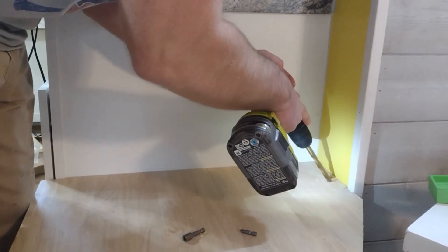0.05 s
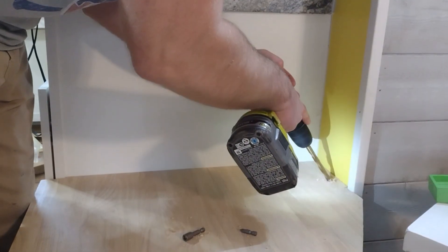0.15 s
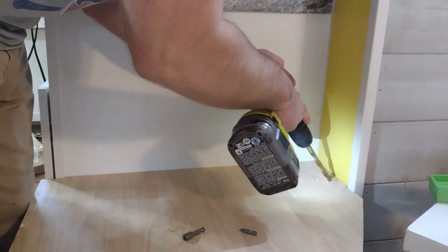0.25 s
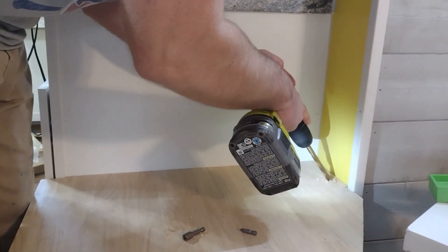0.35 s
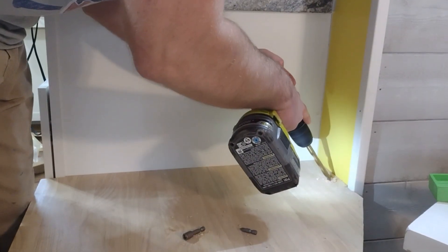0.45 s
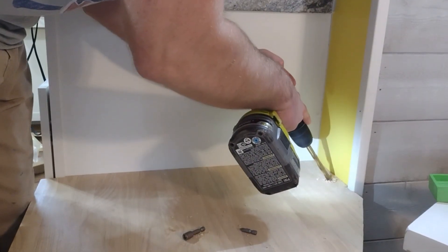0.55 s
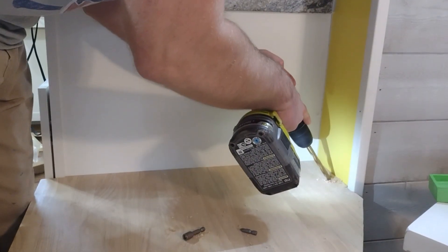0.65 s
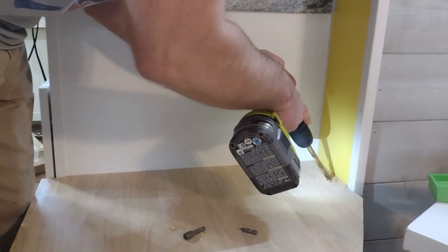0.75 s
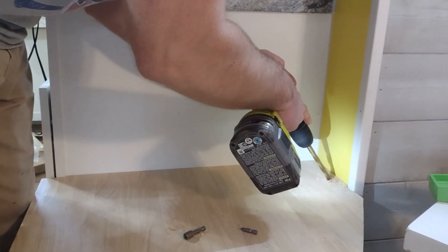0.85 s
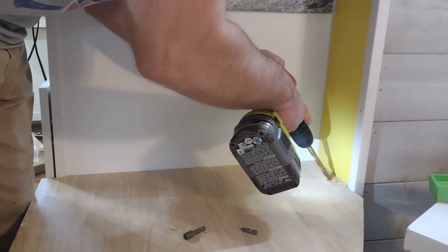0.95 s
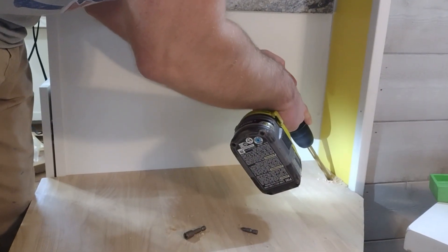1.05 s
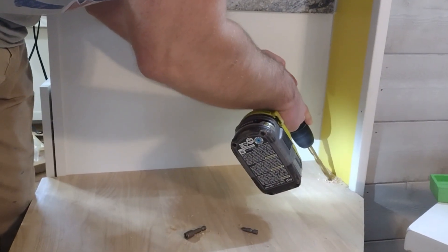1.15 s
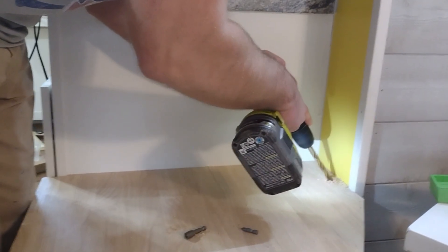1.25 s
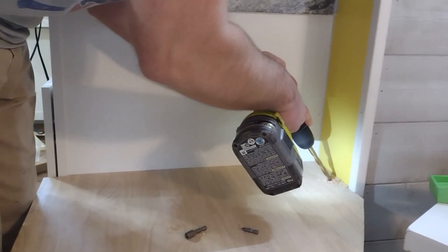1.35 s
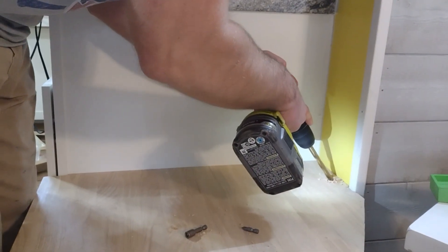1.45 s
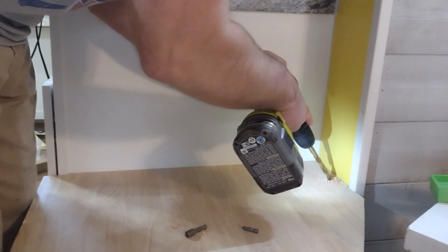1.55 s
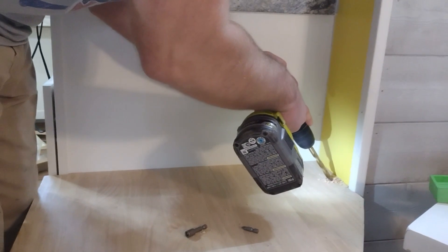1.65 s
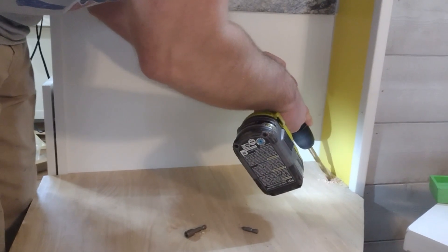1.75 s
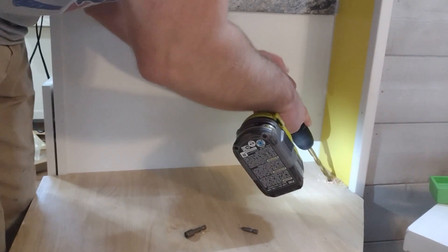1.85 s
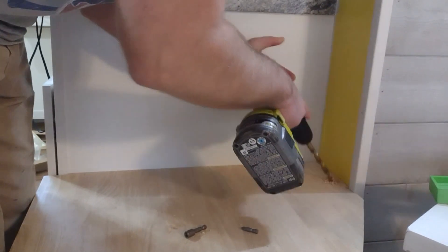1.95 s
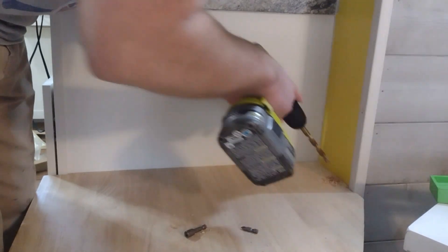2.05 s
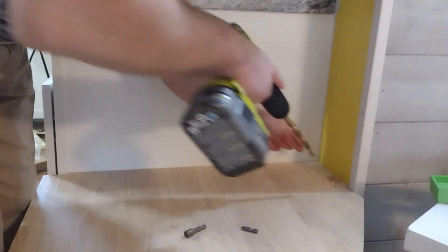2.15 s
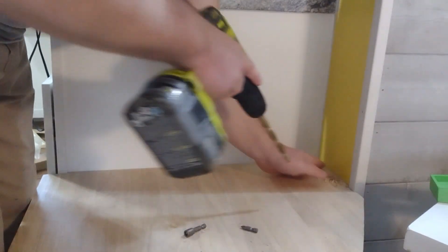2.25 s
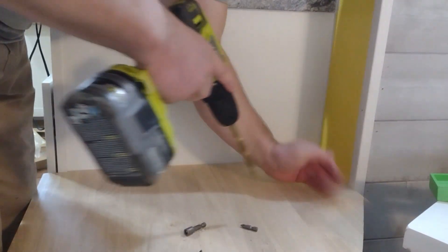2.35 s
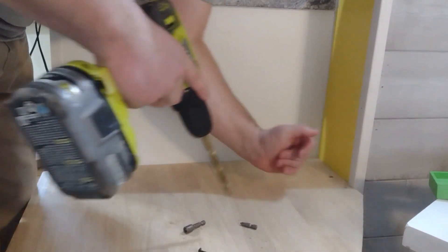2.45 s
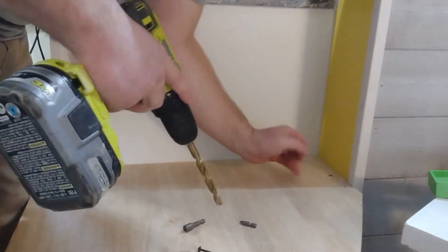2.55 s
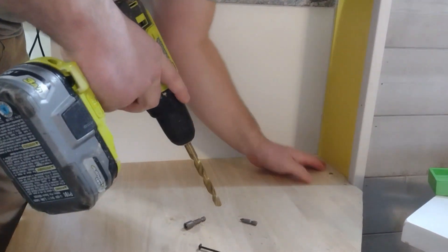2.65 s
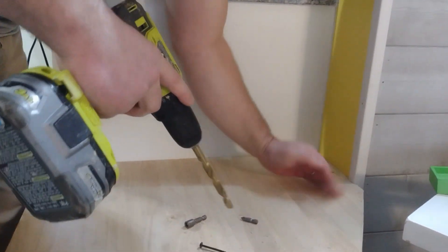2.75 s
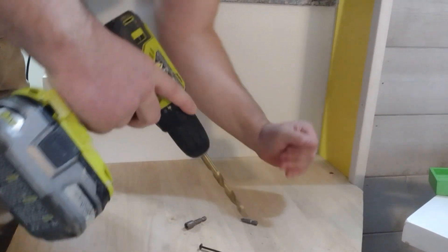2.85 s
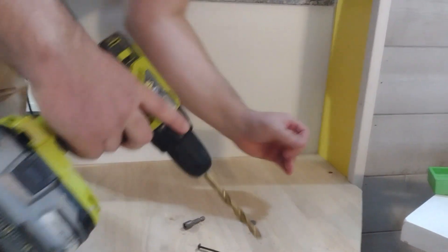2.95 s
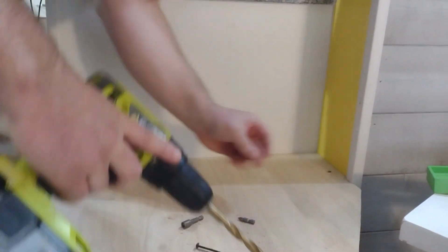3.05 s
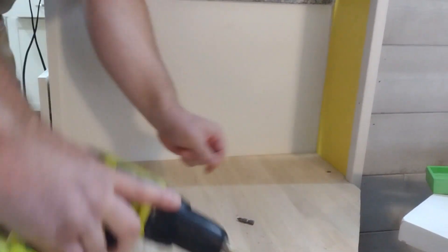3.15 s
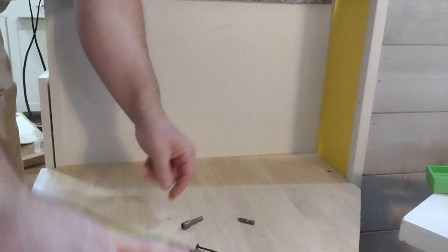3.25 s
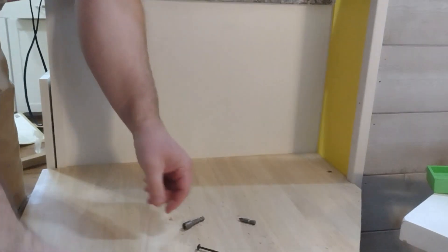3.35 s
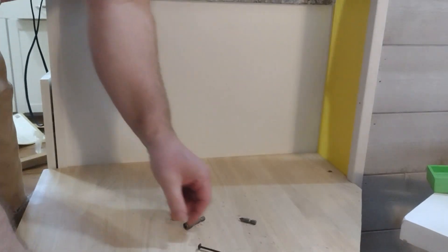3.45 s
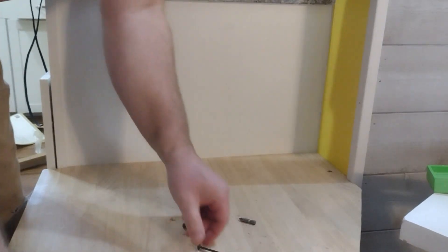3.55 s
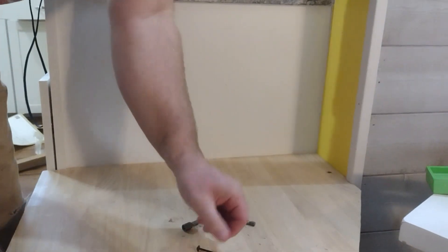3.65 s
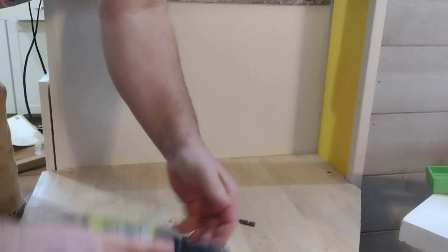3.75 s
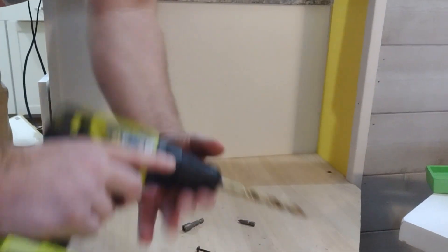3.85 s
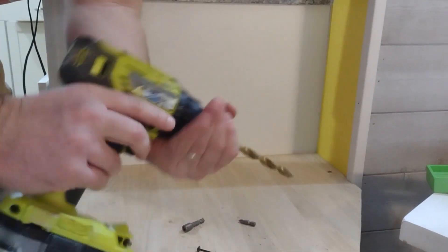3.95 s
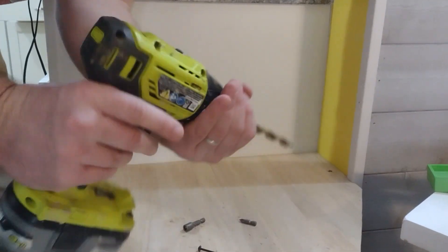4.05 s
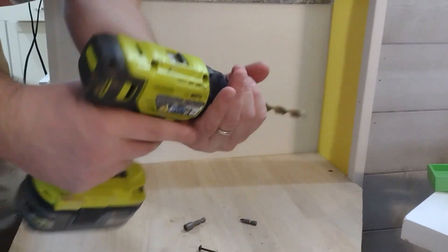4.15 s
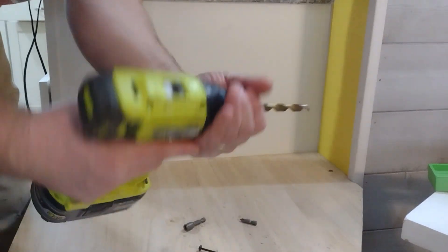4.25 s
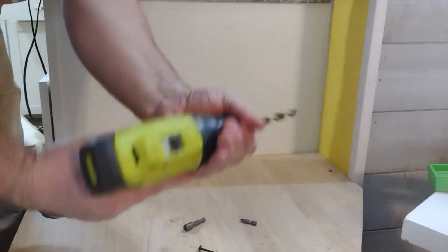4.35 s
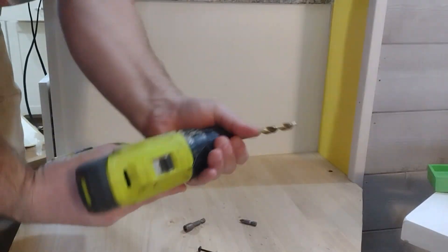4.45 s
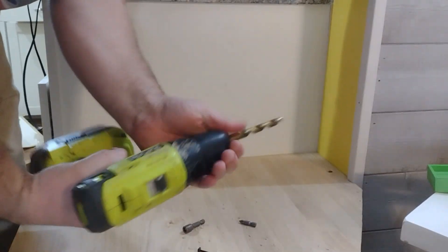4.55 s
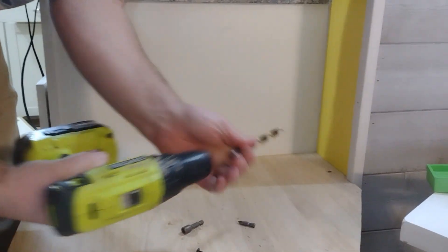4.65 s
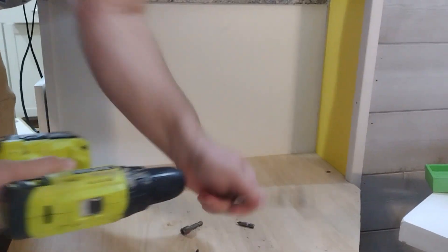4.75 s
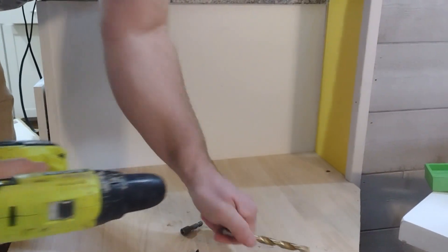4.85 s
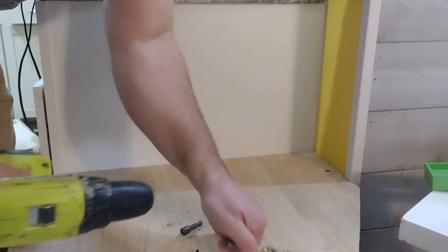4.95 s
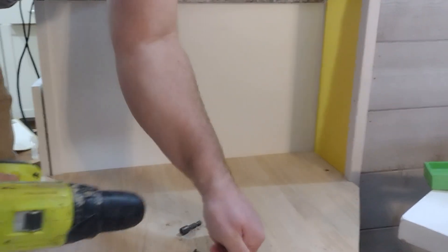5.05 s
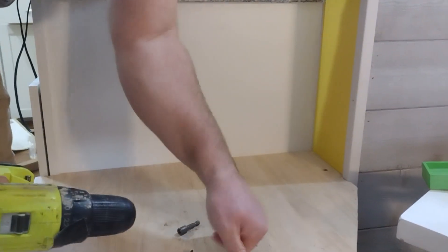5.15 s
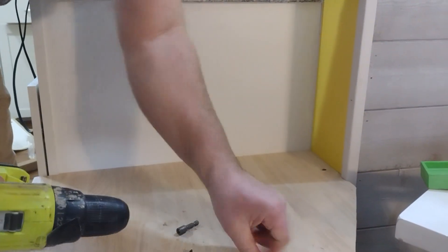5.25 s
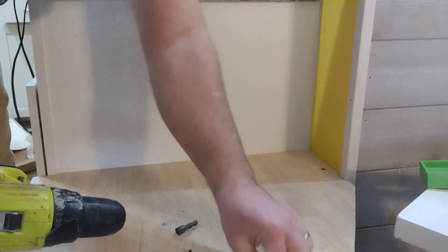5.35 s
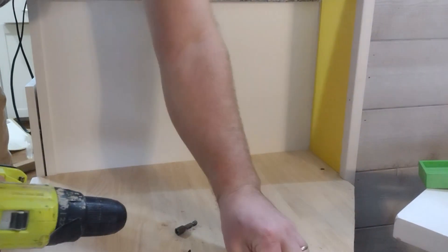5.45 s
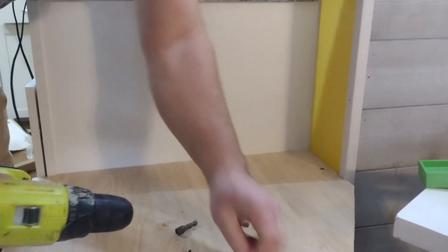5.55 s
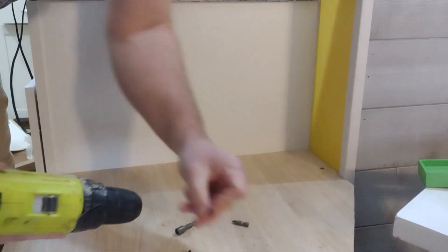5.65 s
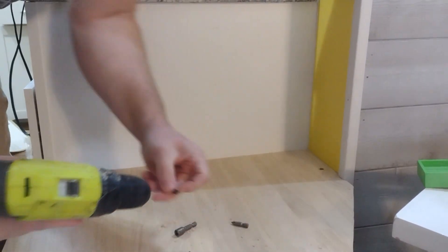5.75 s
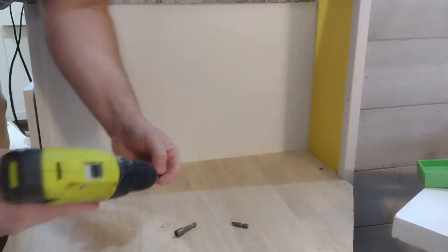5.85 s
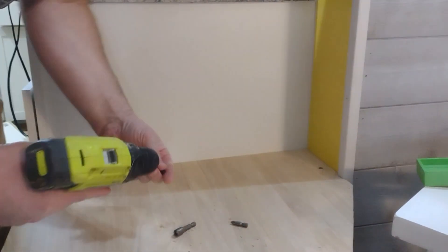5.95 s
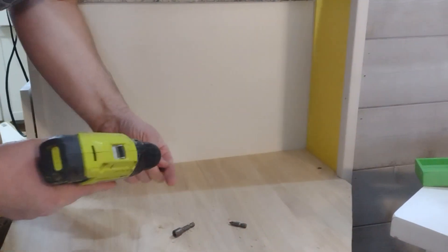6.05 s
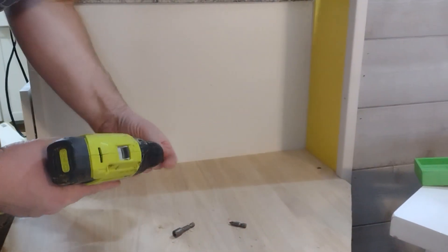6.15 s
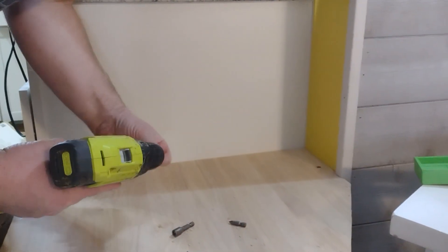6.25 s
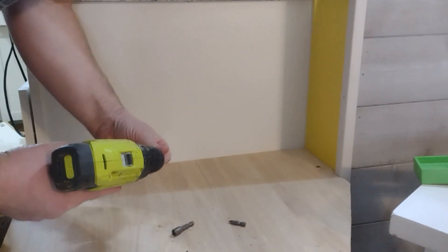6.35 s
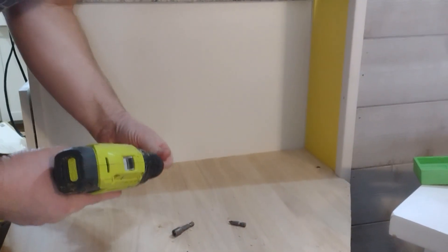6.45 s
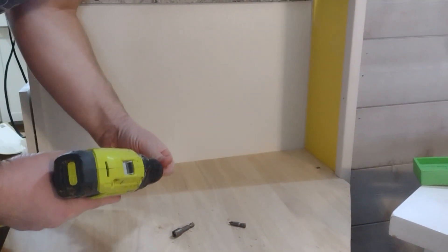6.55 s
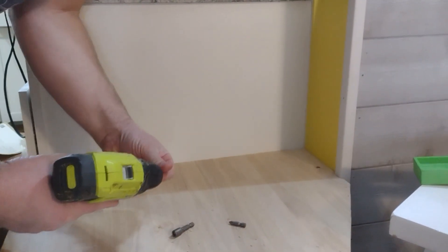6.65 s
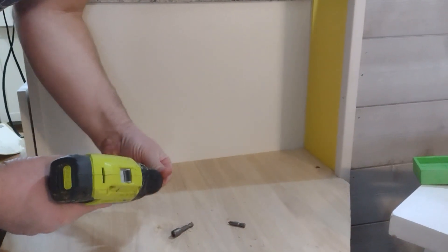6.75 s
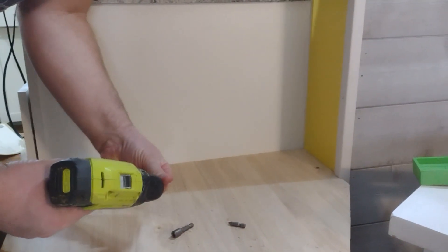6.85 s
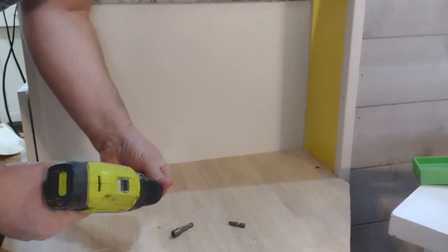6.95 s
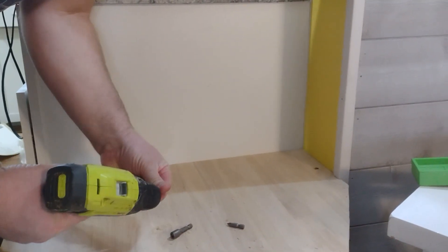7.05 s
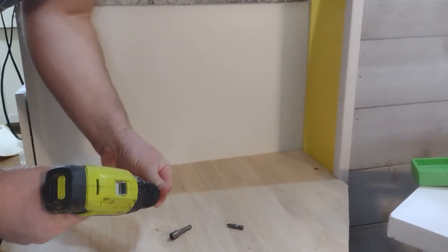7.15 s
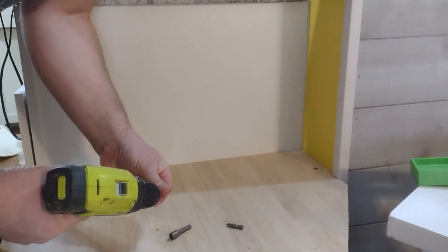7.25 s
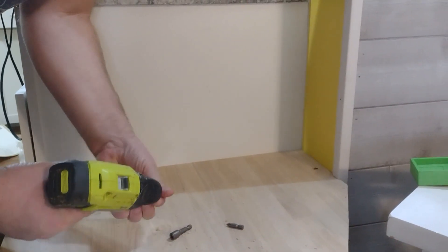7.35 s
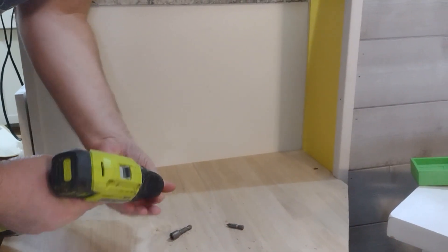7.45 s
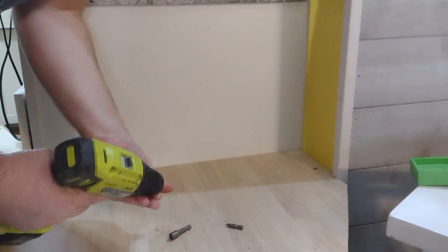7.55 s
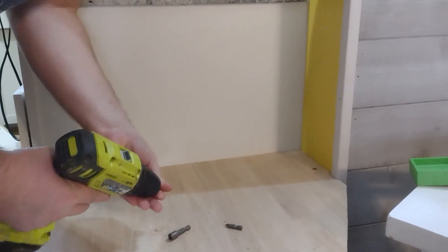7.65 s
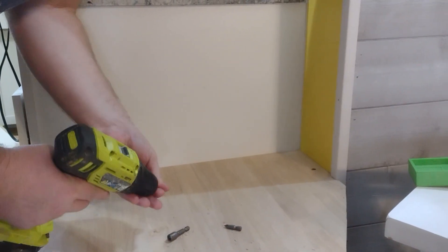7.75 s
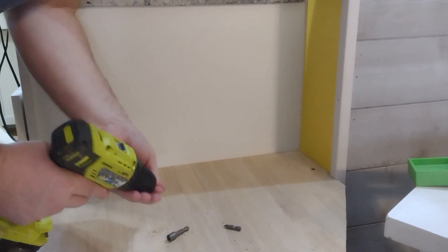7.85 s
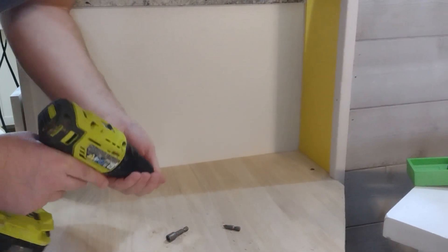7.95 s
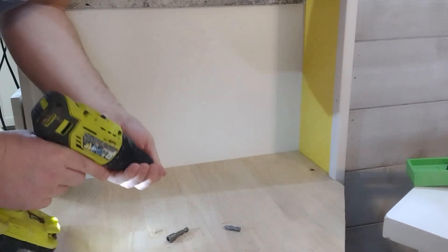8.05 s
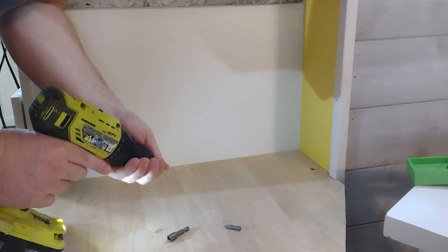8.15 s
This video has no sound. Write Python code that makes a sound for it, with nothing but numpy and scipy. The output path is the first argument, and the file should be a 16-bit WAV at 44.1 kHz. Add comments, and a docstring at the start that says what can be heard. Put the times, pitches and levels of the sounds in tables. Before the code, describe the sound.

Two seconds of loud, rough drilling in wood with a thin high squeal near the end, cut off by a sharp clack. Afterwards it is nearly silent: soft palm swishes on dusty board, a heavy wooden bump, plastic snaps with a very short motor spin, a double knock with a faint steel ring. Finally two chuck clicks, rustling clothing and dull shifting feet. Small indoor room, near stereo microphones, faint background wash.

```python
"""Boring into a wooden cabinet floor

A cordless drill bores with a clatter of gears, throbbing once a turn, and stops with a clack.
A hand sweeps the dust off, the drill bumps the board, the chuck clicks and is spun briefly in the hand.
Knocks excite the cabinet's modes and make loose steel bits ring; feet shift and clothes rub in a small room.
Noise, pulses and sines drive the sources; filters give their resonances, and echoes and a tail the room."""
import sys
import numpy as np
from scipy import signal
from scipy.io import wavfile
from scipy.ndimage import uniform_filter1d

SR = 44100
rng = np.random.default_rng(int(sys.argv[2]) if len(sys.argv) > 2 else 0)


def unload_wav(signal):
    """Save mono or channel-first audio to the path in sys.argv[1] as 16-bit WAV at rate SR, clipped to [-1, 1]."""
    wavfile.write(
        sys.argv[1],
        SR,
        np.round(np.clip(np.atleast_2d(signal).T, -1, 1) * 32767).astype(np.int16),
    )


N = 361619
TAPS = 8192
HZ, T = np.fft.rfftfreq(TAPS, 1 / SR), np.arange(N) / SR  # filter frequencies [Hz], time [s]


def drill():
    """Forced vibration: gear impacts excite the housing, while periodic cutting force tears the fibres."""
    # chuck speed while boring: (time [s], speed [turns/s])
    speed_curve = [(0, 15.4), (.6, 15.5), (.72, 17.2), (.9, 15.9), (1.28, 15.9), (1.36, 13.8), (1.44, 15.8),
                   (1.85, 15.6), (2.06, 13)]
    # motor noise spectrum: (frequency [Hz], relative density [dB])
    motor_spectrum = [(60, -27), (200, -12), (500, -5), (1200, -2.5), (2100, -1.5), (2600, -1.5),
                      (3600, -2.5), (4200, 1), (4600, -8.5), (6000, -9), (7200, -4.5), (11000, -11.5),
                      (13500, -15.5), (15200, -11.5)]
    # modes of the drill's housing and bit: (frequency [Hz], width [Hz], level [dB])
    housing_modes = [(2065, 120, 5.5), (3020, 150, 2.5), (4256, 110, 4), (5070, 460, 7.5), (7000, 400, 0)]
    # cutting noise spectrum ahead of the cabinet modes: (frequency [Hz], relative density [dB])
    cut_spectrum = [(30, -46), (60, -31), (90, -14.5), (180, 2.5), (500, 0), (1050, 0.5), (2000, -2),
                    (2600, -15), (4200, -18), (8000, -19.5), (16000, -41.5)]
    through_s, unload_s = 1.84, 0.15  # the bit breaks through; decay time of the load
    stop_s, brake_s = 2.055, .008  # the brake stops the motor; decay time
    motor_db, motor_unloaded_db = -25.5, -6  # loaded level, change without load
    cut_db, cut_db_per_s = -25.5, -1.36  # the cut slowly lightens
    whine_mid_db, whine_unloaded_db = -45, 1  # level at half load, change from full to no load
    bite_db, whine_bite_db = 4.4, 4  # per unit of bite

    running = gate(0, stop_s, brake_s)
    load = gate(0, through_s, unload_s)
    gears, tone, bite = gear_train(np.interp(T, *np.transpose(speed_curve)))

    housing = read(motor_spectrum) + sum(db * bump(hz, width) for hz, width, db in housing_modes)
    motor = unit(colour(gears, housing)) * amp(motor_db + motor_unloaded_db * (1 - load))

    fibres = shifting(wide(lambda: grains(per_s=2500, spread_db=2.5)), patch_db=1.5)
    fibres = fibres * amp(bite_db * bite + 1.0 * waver(41))
    cutting = unit(colour(fibres, read(cut_spectrum) + 1.3 * panel()))
    cutting = cutting * load * amp(cut_db + cut_db_per_s * T)

    whine = tone * amp(whine_mid_db + whine_unloaded_db * (0.5 - load) + whine_bite_db * bite * load)

    # the bit squeals as it sinks deep into the hole
    squeal_hz = 8150 + 22 * waver(150)
    squeal = unit(np.sin(2 * np.pi * np.cumsum(squeal_hz) / SR) * amp(2.5 * waver(40)))
    squeal = squeal * amp(-37.5) * swell(1.7, rise_s=.36, fall_s=.22)
    return room((motor + cutting + whine + squeal) * running, wet_db=-7.5, lag_ms=-.05)


def gear_train(speed):
    """Gear meshing: tooth contacts repeat in proportion to chuck speed; returns clatter, whine and bite."""
    mesh_per_turn, first_bite_turns = 84, .12
    turns = np.cumsum(speed) / SR
    angle = 2 * np.pi * (turns - first_bite_turns)
    bite = np.cos(angle) + .3 * np.cos(2 * angle)  # short surges, long lulls
    teeth = np.cumsum(mesh_per_turn * speed * (1 + .006 * waver(60))) / SR
    contacts = np.diff(np.floor(teeth), prepend=0)
    chatter = np.cos(2 * np.pi * 6.15 * turns)  # the planet gears load and unload
    clatter = shifting(wide(lambda: (2.7 * contacts + 1) * rng.standard_normal(N)), patch_db=2.0)
    gears = clatter * amp(0.98 * bite + 0.76 * chatter + .5 * waver(25))
    mesh = 2 * np.pi * teeth
    tone = unit(np.sin(mesh) + amp(-13) * np.sin(2 * mesh))
    return gears, tone, bite


def spin():
    """Free rotation: the unloaded motor runs up and is braked; clatter and whine grow with its speed."""
    # unloaded motor noise spectrum: (frequency [Hz], relative density [dB])
    free_spectrum = [(60, -48), (200, -29.5), (500, -3.5), (900, -6), (1400, 1), (2200, -3.5), (3500, 1.5),
                     (6000, -9), (8200, -2.5), (12000, -16.5), (15000, -7)]
    start_s, end_s = 4.372, 4.518
    run_up_s, coast_s, brake_s = 0.025, .25, .012  # time constants: speed up, speed down, sound dying
    full_turns_per_s = 17.7
    run_up = 1 - np.exp(-np.maximum(T - start_s, 0) / run_up_s)
    pace = run_up * gate(start_s, end_s, coast_s)  # share of full speed
    gears, tone, _ = gear_train(full_turns_per_s * pace)
    clatter = unit(colour(gears, read(free_spectrum))) * amp(-24.5) * pace ** 1.63
    whine = tone * amp(-33.5 + 1.9 * waver(120)) * pace ** 5
    return room((clatter + whine) * gate(start_s, end_s, brake_s), wet_db=-17, lag_ms=-.18)


def knocks():
    """Impact excitation: each blow drives the cabinet's modes, weighted by where and how hard it lands."""
    # board spectrum ahead of the cabinet modes: (frequency [Hz], relative density [dB])
    board_spectrum = [(30, -32), (70, -22.5), (170, -5.5), (500, -6), (1000, -8.5), (2100, -3), (3200, -11),
                      (5000, -14), (9000, -21), (16000, -23.5)]
    # blows: (time [s], level [dB], hardness corner [Hz], the spot's own note [Hz],
    # the note's strength before weighting [dB], rattle decay time [s])
    blow_table = [(0.125, -23.5, 707, 332, 16.5, 0.012), (0.456, -25.5, 2500, 450, 5, 0.0087),
                  (1.396, -30, 600, 194, 11.5, 0.0097), (2.047, -27, 9000, 250, 0.5, 0.0029),
                  (2.436, -35, 800, 403, 0.5, 0.016), (3.665, -28, 7000, 463, -0.5, 0.011),
                  (3.672, -23, 400, 85, 11, 0.031), (3.7004, -14, 2000, 346, 8.5, 0.014),
                  (3.707, -14.5, 13870, 220, 16, 0.008), (3.711, -21, 258.7, 79.9, 12, 0.022),
                  (4.659, -46.5, 1820, 500, -1, 0.013), (4.672, -42.5, 5950, 1690, 11.5, 0.0079),
                  (5.033, -31.5, 1015, 650, 2.5, .026), (5.063, -36, 800, 650, 7.5, .04),
                  (5.152, -14.5, 2200, 700, 5.5, 0.015), (5.193, -14.5, 2300, 2020, 7.5, 0.024),
                  (5.36, -53.5, 3000, 1500, -5, 0.051), (5.444, -37, 3140, 272, 9, 0.043),
                  (5.638, -55, 11930, 2500, 8, 0.045)]
    heavy_note_hz, light_db_per_octave = 300, -7
    wood = np.zeros((2, N))
    body = read(board_spectrum) + 0.85 * panel()
    for s, db, hard_hz, note_hz, note_db, seconds in blow_table:
        # each spot favours the modes near one note
        spot = note_db * (0.97 * bump(note_hz, 3.9 * note_hz) + 0.6 * bump(note_hz, 110))
        # higher-pitched blows are light and hardly move the deepest modes
        light = light_db_per_octave * max(np.log2(note_hz / heavy_note_hz), 0) * amp(soft(110))
        shape = body + 1.48 * soft(hard_hz) + spot + light
        add(wood, s, amp(db) * struck(colour(blow(seconds, rattle=7.5), shape)))
    return room(wood, wet_db=-10.0, lag_ms=-.3)


def panel():
    """Modal resonance: peaks of the cabinet's response over a constant background (dB)."""
    # cabinet modes: (frequency [Hz], width [Hz], peak [dB re 3 dB above the background])
    cabinet_modes = [(86, 28, 9.5), (134, 13, 4), (182.8, 27, 6.5), (230, 91, 2.5), (321.5, 40, 7),
                     (446.5, 42, 10), (498, 59, 7), (569.7, 40, 5.5), (806.5, 100, 4.5), (1046, 67, 4.5),
                     (1275, 150, -1.5), (2020, 100, 3)]
    peaks = sum(amp(db) ** 2 / (1 + (2 * (HZ - hz) / width) ** 2) ** 2 for hz, width, db in cabinet_modes)
    return 10 * np.log10(.5 + peaks)


def clinks():
    """Free vibration: loose steel bits ring on the board as exponentially damped sines."""
    # modes of the bits: (frequency [Hz], level [dB], undamped t60 [s])
    steel_modes = [(3950, -5.5, 0.09), (4398, -14, 0.35), (7850, -9.5, 0.49), (7870, -11, .3),
                   (10300, -33, 0.44), (13160, -19, .12), (14330, -22.5, .3)]
    # ringing onsets: (time [s], level [dB])
    clink_table = [(4.674, -39.5), (5.033, -67.5), (5.151, -54), (5.193, -41)]
    fingers_leave_s = 4.9
    steel, t = np.zeros(N), np.arange(SR // 2) / SR
    ring = sum(amp(db - 60 * t / t60) * np.sin(2 * np.pi * hz * t) for hz, db, t60 in steel_modes)
    for s, db in clink_table:
        damping = np.exp(-t / 0.019) if s < fingers_leave_s else 1  # a bit held in the fingers only ticks
        add(steel, s, amp(db) * ring * damping)
    return room(steel, wet_db=3.5, lag_ms=0)


def clicks():
    """Hard impact: brief broadband snaps of the chuck and spindle lock in a plastic sleeve."""
    # chuck spectrum: (frequency [Hz], relative density [dB])
    chuck_spectrum = [(60, -33), (300, -23.5), (650, -10.5), (950, 1.5), (1350, 2), (1650, 1.5),
                      (2100, 0.5), (3200, -0.5), (4500, -8), (7000, -12), (11000, -21), (16000, -22)]
    # snaps: (time [s], peak before a common 4.5 dB gain [dB], treble [dB], left-right difference [dB])
    click_table = [(2.056, -6.5, 0.5, 0.5), (2.999, -46, 4, 1), (3.056, -38, 4.5, 0.5),
                   (3.952, -46.5, 3, -2), (4.009, -32, 0.5, -1.5), (4.072, -20.5, -7.5, 1.5),
                   (4.097, -8, 0.5, -1), (4.251, -36.5, -3, 2.5), (4.328, -35.5, -14, -0.5),
                   (4.39, -27, 2, 2), (4.406, -15.5, -7.5, 3.5), (4.511, -14, 10.5, 1.5),
                   (6.328, -52, 9.5, 6), (6.528, -48, 12, 2.5), (6.836, -21, 6.5, 2),
                   (6.894, -11.5, -1, 5.5), (7.779, -35, -9, 3)]
    out = np.zeros((2, N))
    for s, db, treble_db, pan_db in click_table:
        shape = read(chuck_spectrum) + treble_db * (1 - amp(soft(4000)))
        snap = colour(blow(seconds=0.0042, rattle=7), shape)
        pan = amp([[pan_db / 2], [-pan_db / 2]])
        add(out, s, amp(db + 4.5) * snap / abs(snap).max() * pan)
    return room(out, wet_db=-12.5, lag_ms=-.2)


def sweeps():
    """Sliding friction: fine grains of skin on dusty wood and plastic, swelling with each stroke."""
    # palm spectrum: (frequency [Hz], relative density [dB])
    palm_spectrum = [(150, -23.5), (350, -5), (650, -7.5), (1000, -6.5), (2200, -7), (4000, -10),
                     (7500, -10.5), (11000, -12.5), (15000, -7)]
    # strokes: (fastest moment [s], level [dB], rise plus fall time constants [s])
    stroke_table = [(2.222, -59, .012), (2.37, -57.5, 0.056), (2.438, -45, 0.056), (2.72, -61.5, .08),
                    (2.835, -49.5, 0.084), (3.02, -61.5, 0.064), (3.19, -67, .07), (4.01, -59, 0.19),
                    (4.22, -58, .2), (4.64, -59.5, .17), (4.87, -60.5, .08), (4.977, -58, 0.026)]
    rising = 0.63  # share of a stroke spent speeding up
    power = sum((amp(db) * swell(s, rising * length, (1 - rising) * length)) ** 2
                for s, db, length in stroke_table)
    palm = unit(colour(wide(lambda: grains(per_s=5900, spread_db=1.0)), read(palm_spectrum)))
    return room(palm * np.sqrt(power), wet_db=-7.5, lag_ms=0)


def steps():
    """Soft impact: the floor thumps dully under shifting weight, the heel, then the sole."""
    # floor spectrum ahead of the cabinet modes: (frequency [Hz], relative density [dB])
    floor_spectrum = [(25, -29.5), (55, -8), (85, 3), (130, 1.5), (190, -2.5), (300, -13.5), (600, -16.5),
                      (2000, -28), (8000, -40.5)]
    # feet: (heel time [s], heel level [dB], hardness corner [Hz], sole delay [s], sole re heel [dB])
    foot_table = [(0.928, -34, 119, .04, -4.5), (3.269, -60, 820, 0.14, -6), (4.786, -58.5, 99, 0.033, -15),
                  (6.135, -53.5, 92, 0.05, -2.5), (6.573, -47.5, 109, 0.085, 4.5),
                  (7.172, -36, 625, .042, -2), (7.387, -40.5, 1000, .076, -2.5),
                  (7.772, -32.5, 514, .027, -2), (7.99, -38, 446, 0.089, 4.5),
                  (8.124, -37.5, 507, 0.058, -10)]
    out = np.zeros((2, N))
    for s, db, hard_hz, sole_s, sole_db in foot_table:
        light = -5.5 * np.log2(hard_hz / 100) * amp(soft(95))  # a quick scuff hardly moves the deepest mode
        shape = read(floor_spectrum) + soft(hard_hz) + light + 1.1 * panel()
        for late_s, weight_db in ((0, 0), (sole_s, sole_db)):
            thump = struck(colour(blow(seconds=0.02, rattle=1.3), shape))
            add(out, s + late_s, amp(db + weight_db) * thump)
    return room(out, wet_db=-4.0, lag_ms=0)


def rubbing():
    """Stick and slip: threads catch as cloth slides on cloth; each rub has its own body and brightness."""
    # cloth spectrum: (frequency [Hz], relative density [dB])
    cloth_spectrum = [(60, -15.5), (200, -2.5), (450, -6), (750, -5.5), (1200, -7), (1700, -5.5),
                      (2400, -2), (3300, -18), (4300, -18), (5500, -18), (8000, -28.5), (15800, -34.5)]
    # rubs: (fastest moment [s], level [dB], rise [s], fall [s], gain near 800 Hz [dB], treble gain [dB])
    rub_table = [(6.79, -58.5, 0.05, 0.063, 2.5, 3), (6.891, -38, 0.057, 0.071, -5, 3.5),
                 (7.07, -34.5, 0.13, 0.13, -5.5, -9), (7.28, -43, 0.11, 0.13, -1, -2.5),
                 (7.475, -45.5, 0.027, 0.1, 8.5, -1), (7.595, -44.5, 0.085, .045, 4.5, -5),
                 (7.75, -56.5, 0.11, 0.14, 6, -0.5), (7.868, -37.5, .012, 0.028, 10.5, -6),
                 (7.907, -30.5, 0.035, 0.068, 2.5, -1), (8.03, -37, 0.14, 0.15, -6, -3),
                 (8.2, -33, 0.047, .05, 4.5, 10.5)]
    body_hz, treble_hz = (600, 1200), 3500
    threads = shifting(wide(lambda: grains(per_s=2200, spread_db=3.4)), patch_db=2.8)
    cloth = unit(colour(threads, read(cloth_spectrum)))
    dull = signal.sosfiltfilt(signal.butter(2, treble_hz, fs=SR, output="sos"), cloth)
    body = signal.sosfiltfilt(signal.butter(2, body_hz, "band", fs=SR, output="sos"), dull)
    power = sum((amp([[db], [db + body_db], [db + treble_db]]) * swell(s, rise_s, fall_s)) ** 2
                for s, db, rise_s, fall_s, body_db, treble_db in rub_table)
    bands = (dull - body, body, cloth - dull)
    rubs = sum(band * gain for band, gain in zip(bands, np.sqrt(power)))
    return room(rubs, wet_db=-4.0, lag_ms=0.26)


def air():
    """Stationary noise, spectrally shaped: the quiet wash of the room, a little stronger early on."""
    # background spectrum: (frequency [Hz], relative density [dB])
    air_spectrum = [(15, -63), (25, -20.5), (170, -5.5), (205, -5.5), (307, -13), (620, -14.5),
                    (672, -24.5), (791, -14), (955, -21.5), (1680, -19.5), (4450, -29), (15800, -35)]
    wash = unit(colour(wide(lambda: rng.standard_normal(N)), read(air_spectrum)))
    return wash * amp(-73 + np.interp(T, [3.6, 5.8], [5, .5]))


def room(x, wet_db, lag_ms, count=3):
    """Reverberation: lagged direct sound, wall echoes and a tail blended from slowly alternating noises."""
    # reverberation: (frequency [Hz], t60 [s])
    decay_table = [(60, 0.68), (200, 0.31), (500, 0.26), (2500, 0.25), (6000, 0.18), (15000, 0.19)]
    # echoes off the cabinet walls: (delay at the left ear [ms], at the right ear [ms], level [dB])
    wall_table = [(1.3, 2.1, -24), (3.7, 2.9, -25.5), (4.6, 5.3, -18.5), (8.3, 7.9, -21)]
    x = x * np.ones((2, 1))
    out = delayed(x, lag_ms, -lag_ms)  # a positive lag delays the left ear, a negative one the right
    out = out + sum(amp(db) * delayed(x, left, right) for left, right, db in wall_table)
    for k in range(count):
        hz, t, z = signal.stft(wide(lambda: rng.standard_normal(SR * 3 // 4)), SR, nperseg=256)
        decay = amp(-60 * t / read(decay_table, hz)[:, None])
        onset = np.minimum(t / .006, 1)
        tail = signal.istft(z * decay * onset, SR, nperseg=256)[1]
        tail = tail / np.linalg.norm(tail[0])
        # the random tails alternate at a fixed rate, for a smooth decay
        turn = np.sqrt(2 / count) * np.cos(2 * np.pi * (1.3 * T + k / count))
        out += amp(wet_db) * signal.oaconvolve(x * turn, tail, axes=1)[:, :N]
    return out / np.sqrt(1.39 + amp(wet_db) ** 2)


def wide(source):
    """Interaural decorrelation: each ear hears its own mix; the bass is nearly common to both."""
    # stereo width: (frequency [Hz], side re mid [dB])
    width_table = [(60, -24), (150, -28), (300, -18), (600, -9), (1200, -5), (3000, -5), (15000, -5)]
    mid, side = source(), colour(source(), read(width_table))
    return np.array([mid + side, mid - side])


def shifting(x, patch_db, size=2048):
    """Varying modal coupling: resonances come and go as the contact point wanders."""
    hz, _, z = signal.stft(x, SR, nperseg=size, noverlap=size * 3 // 4)
    # patches about 100 Hz by 45 ms
    patches = uniform_filter1d(rng.standard_normal(z.shape[1:]), 4, axis=0)
    patches = unit(uniform_filter1d(patches, 4, axis=1, mode="wrap"))
    depth = np.interp(hz, [120, 600, 3000, 8000], [0, 1, 1, .4])[:, None]
    z = z * amp(patch_db * depth * patches)
    return signal.istft(z, SR, nperseg=size, noverlap=size * 3 // 4)[1][:, :N]


def grains(per_s, spread_db):
    """Shot noise: random snaps of uneven size and either sign, scaled to rms 1."""
    size = amp(spread_db * np.minimum(rng.exponential(1, N), 4))
    return unit(size * rng.choice([-1, 1], N) * (rng.random(N) < per_s / SR))


def blow(seconds, rattle):
    """Impulse excitation: one push and an exponentially dying rattle."""
    t = np.arange(SR // 2) / SR
    burst = wide(lambda: rng.standard_normal(len(t))) * np.exp(-t / seconds)
    return (t == 0) + rattle * burst / np.linalg.norm(burst[0])


def soft(hz):
    """Contact compliance: a soft contact falls 9 dB per octave far above hz (dB)."""
    return -10 * np.log10(1 + (HZ / hz) ** 3)


def bump(hz, width):
    """Resonance: a Lorentzian curve, 1 at its centre and half as high at half the width to either side."""
    return 1 / (1 + (2 * (HZ - hz) / width) ** 2)


def gate(on_s, off_s, release_s):
    """Exponential relaxation: full on between two times, then dying away."""
    return (T >= on_s) * np.exp(-np.maximum(T - off_s, 0) / release_s)


def swell(s, rise_s, fall_s):
    """Gaussian envelope: a movement gathers speed, peaks at time s and slows again."""
    return np.exp(-((T - s) / np.where(T < s, rise_s, fall_s)) ** 2)


def waver(per_s):
    """Random modulation: noise smoothed twice over 1 / per_s seconds, scaled to rms 1."""
    size = max(int(SR / per_s), 1)
    return unit(uniform_filter1d(uniform_filter1d(rng.standard_normal(N), size), size))


def delayed(x, left_ms, right_ms):
    """Propagation delay: each ear's channel arrives that much later; negative delays count as none."""
    lags = [max(round(ms * SR / 1000), 0) for ms in (left_ms, right_ms)]
    return np.array([np.pad(ear, (lag, 0))[:N] for ear, lag in zip(x, lags)])


def colour(x, db):
    """Minimum-phase filtering: a causal filter with the given gain at HZ."""
    log_gain = np.log(amp(np.r_[db, db[-2:0:-1]]))
    # the Hilbert transform of the log gain gives the phase
    taps = np.fft.ifft(np.exp(np.conj(signal.hilbert(log_gain)))).real[:TAPS // 2]
    taps = taps.reshape((1,) * (x.ndim - 1) + (-1,))
    return signal.oaconvolve(x, taps, axes=-1)[..., :x.shape[-1]]


def read(points, hz=HZ):
    """Logarithmic frequency scale: a table's values interpolated at hz."""
    f, value = np.transpose(points)
    return np.interp(np.log(hz + 1), np.log(f + 1), value)


def amp(db):
    """Level definition: decibels to amplitude gain."""
    return 10 ** (np.asarray(db) / 20)


def unit(x):
    """Mean-square normalisation: scaled to rms 1."""
    return x / np.sqrt(np.mean(x ** 2) + 1e-20)


def struck(x):
    """Onset normalisation: scaled so that the first 15 ms have rms 1."""
    return x / np.sqrt(np.mean(x[:, :660] ** 2))


def add(mix, s, sound):
    """Superposition: adds a sound to the mix at time s."""
    part = mix[..., round(s * SR):][..., :sound.shape[-1]]
    part += sound[..., :part.shape[-1]]


def scene():
    """Superposition of all sources in the room."""
    tool = drill() + spin()
    contacts = knocks() + clinks() + clicks()
    worker = sweeps() + steps() + rubbing()
    return tool + contacts + worker + air()


def record(dry):
    """Linear filtering: the colour of two differing microphones, then the band limit."""
    # microphone difference: (frequency [Hz], left-right [dB])
    port_table = [(60, 1), (130, -5), (290, 2.5), (640, -4), (1410, -3.5), (3100, 1.0), (6820, 2.5),
                  (15000, 2.5)]
    edge_hz = 15850
    ports = np.array([signal.firwin2(513, HZ, amp(side * read(port_table) / 2), nfreqs=8193, fs=SR)
                      for side in (1, -1)])
    heard = signal.oaconvolve(dry, ports, "same", axes=1)
    band = signal.firwin(511, edge_hz, window=("kaiser", 9), fs=SR)
    return signal.oaconvolve(heard, band[None], "same")


dry = scene()
out = record(dry)
unload_wav(out)
```